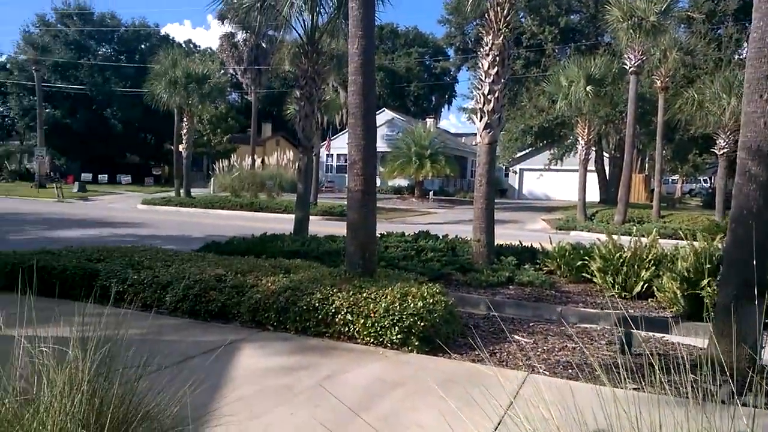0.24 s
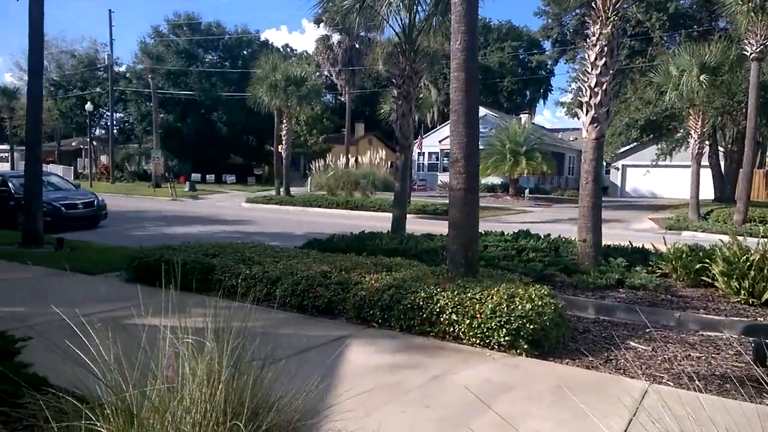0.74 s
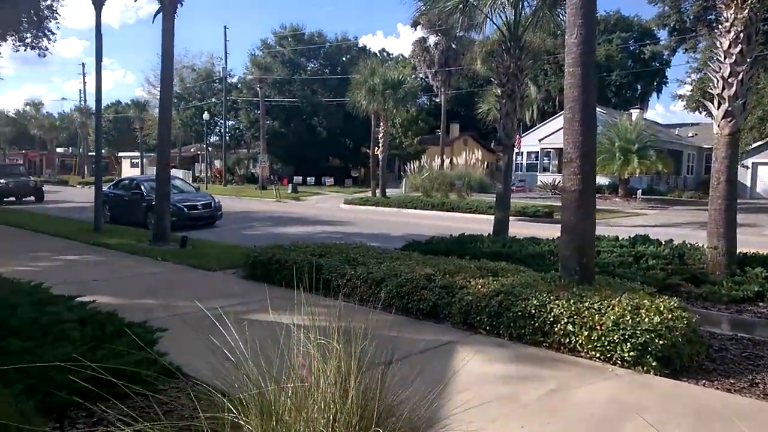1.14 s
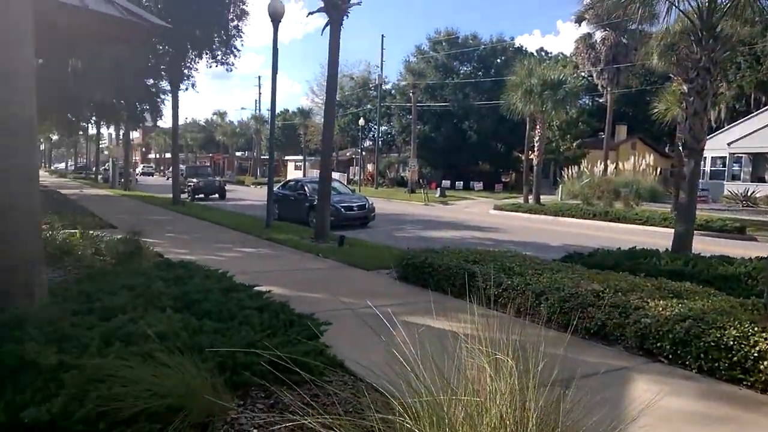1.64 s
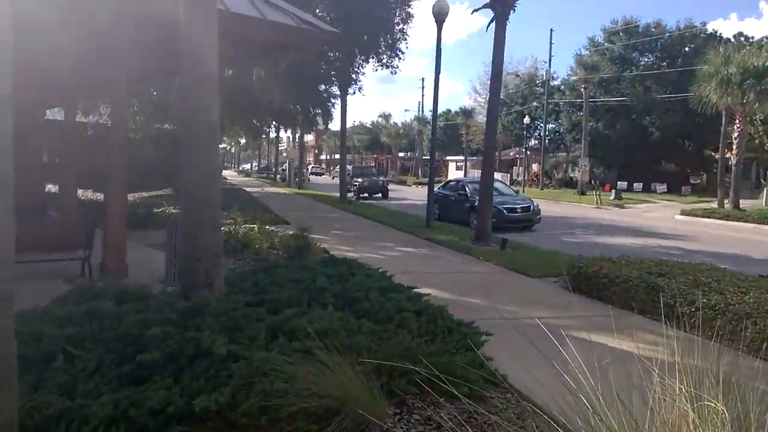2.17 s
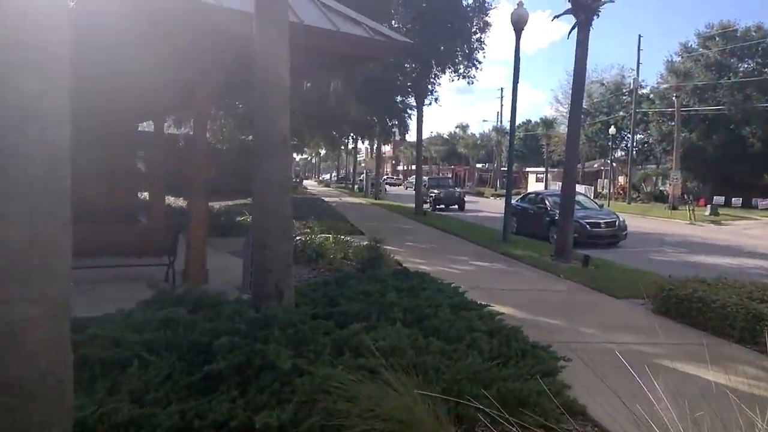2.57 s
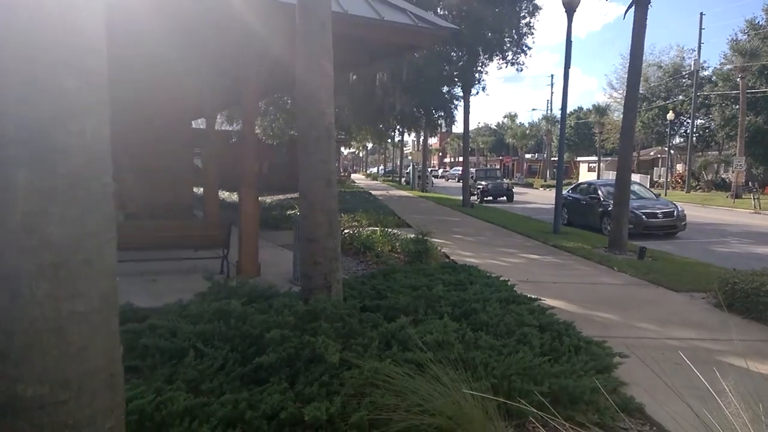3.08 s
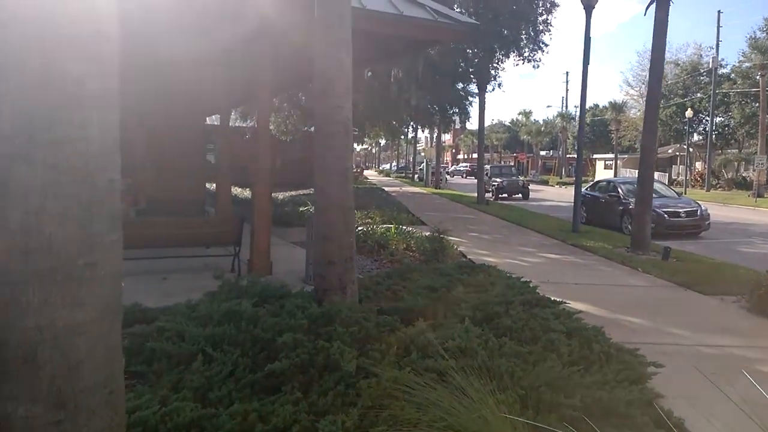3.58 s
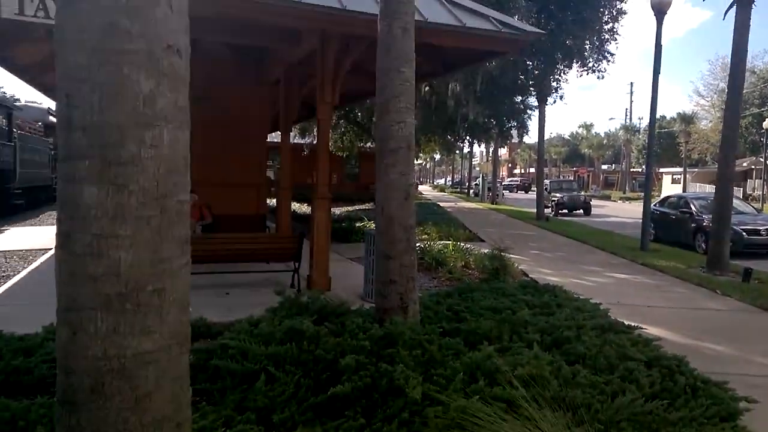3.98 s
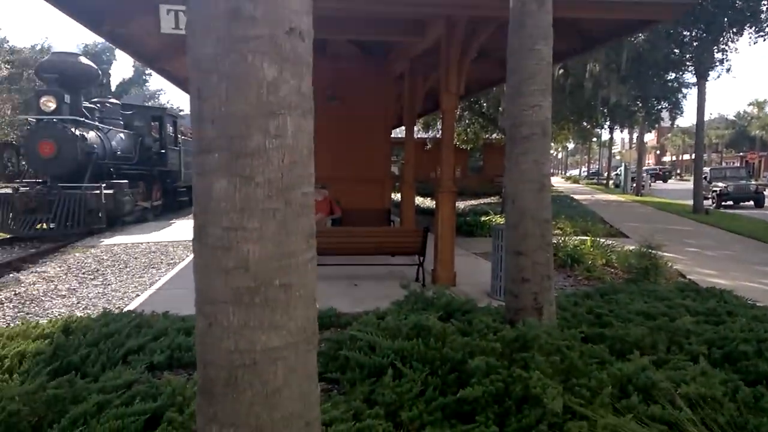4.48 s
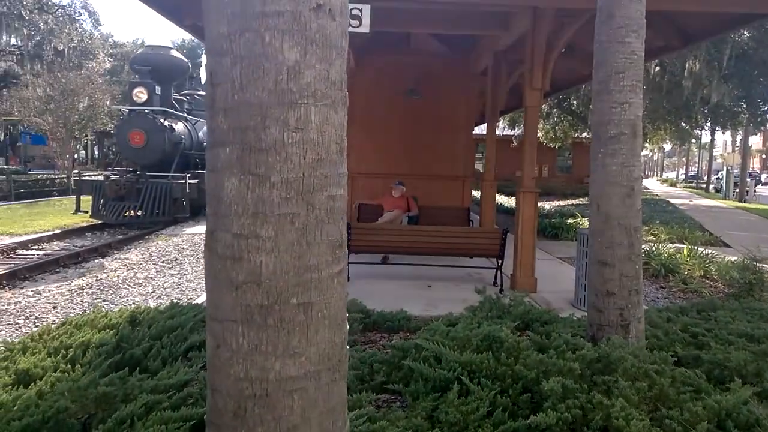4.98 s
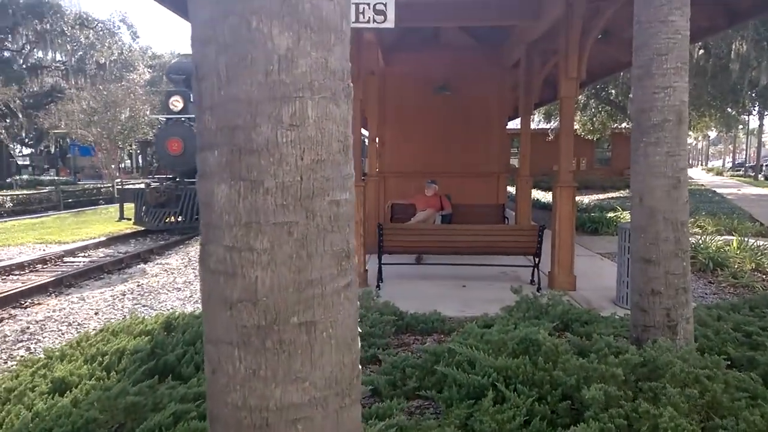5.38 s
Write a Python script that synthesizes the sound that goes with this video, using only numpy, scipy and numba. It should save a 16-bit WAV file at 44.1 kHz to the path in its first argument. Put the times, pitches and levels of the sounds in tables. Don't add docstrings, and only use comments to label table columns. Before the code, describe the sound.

Steam hiss runs throughout, heard at some distance from a garden path by one microphone, identical in both channels apart from tiny noise patches. Early on comes a sharp, quickly fading puff of air with a falling whistle; a second, more pitched puff follows around 2.3 seconds. Afterwards the hiss turns hollow from nearby reflections, then plainer. Weak firebox rumble, generator hum and street murmur stay behind.

```python
import sys
import numpy as np
from scipy import signal
from scipy.fft import rfft, irfft, next_fast_len
from scipy.io import wavfile
from numba import njit

SR = 44100
rng = np.random.default_rng(int(sys.argv[2]) if len(sys.argv) > 2 else 0)


def bounce(signal):
    frames = np.transpose(np.atleast_2d(signal))
    limited = np.clip(frames, -1, 1)
    pcm = np.round(limited * 32767).astype(np.int16)
    wavfile.write(sys.argv[1], SR, pcm)


def elevation(decibels):
    levels = np.asarray(decibels, float)
    return 10 ** (levels / 20)


N = 247842
FINE = 4


def rms_one(x):
    return x / np.sqrt(np.mean(x ** 2) + 1e-20)


def in_time(rows):
    s, *columns = np.transpose(rows)
    return [np.interp(np.arange(N) / SR, s, c) for c in columns]


def drift(rate):
    step = 40
    r = np.exp(-2 * np.pi * step * rate / SR)
    points = rng.standard_normal(N // step + 2002)
    slow = signal.lfilter([1], [1, -2 * r, r * r], points)[2000:]
    return np.interp(np.arange(N) / step, np.arange(len(slow)), rms_one(slow))


def coloured(spectrum, edge_db=-30):
    (first_hz, first_db), (last_hz, last_db) = spectrum[0], spectrum[-1]
    below = [(first_hz / 2, edge_db + first_db)]
    above = [(last_hz * 2, edge_db + last_db)]
    hz, db = np.transpose(below + list(spectrum) + above)
    size = next_fast_len(N)
    bins = np.arange(1, size // 2 + 2) * SR / size
    gain = elevation(np.interp(np.log(bins), np.log(hz), db))
    return rms_one(irfft(rfft(rng.standard_normal(size)) * gain, size)[:N])


@njit
def sweep(x, cosine, r):
    y = np.zeros(len(x))
    for i in range(2, len(x)):
        y[i] = x[i] - x[i - 2] + 2 * r * cosine[i] * y[i - 1] - r * r * y[i - 2]
    return y


def resonant(hz, width_hz, count=1):
    cosine = np.cos(2 * np.pi * hz / SR) * np.ones(N)
    x = rng.standard_normal(N)
    for _ in range(count):
        x = sweep(x, cosine, np.exp(-np.pi * width_hz / SR))
    return rms_one(x)


def pipes(modes):
    return rms_one(sum(elevation(db) * np.sqrt(width) * resonant(hz, width) for hz, width, db in modes))


def peaked(s, length, db, rise, fall):
    t = np.arange(N) / SR
    return db - rise * np.maximum(s - t, 0) - fall * np.maximum(t - s - length, 0)


def finer(x):
    return signal.resample_poly(x, FINE, 1)


def delayed(fine, lag_ms):
    return np.interp((np.arange(N) - lag_ms * SR / 1000) * FINE, np.arange(len(fine)), fine, left=0)


def dulled(x, cut_hz):
    return signal.sosfiltfilt(signal.butter(3, cut_hz, fs=SR, output="sos"), x)


# [f/Hz, level/dB per Hz]
STREET_COLOUR = [(59, -38), (100, -0.5), (130, -11), (166, -13), (220, -13), (311, -24), (433, -21.5),
                 (490, -19.5), (547, -21.5), (700, -23.5), (783, -20), (1520, -18.5), (1900, -10.5),
                 (2470, -55), (4180, -120)]


def street():
    noise = coloured(STREET_COLOUR) + elevation(-15.5) * resonant(490.5, 18)
    return elevation(-49 + 0.81 * drift(14.0)) * noise


# [multiple of the hum, level/dB]
HUM_OVERTONES = [
    (4, -25.5),
    (10, -27),
]


def generator(draught_db):
    hum_hz = 93.8
    hum_db = -50.5 + 1.1 * np.arange(N) / SR + 0.21 * draught_db
    phase = 2 * np.pi * np.cumsum(hum_hz + 0.34 * drift(2.3)) / SR
    hum = 1.05 * np.sin(phase) + 0.58 * resonant(hum_hz, width_hz=7.2)
    nearer_db = np.linspace(-56, -43, N)
    whine = np.zeros(N)
    for multiple, db in HUM_OVERTONES:
        whine += elevation(db + nearer_db + 8.2 * drift(1.2)) * np.sin(round(multiple) * phase)
    return elevation(hum_db) * hum + whine


# [t/s, peak level/dB]
GULPS = [(.12, -41.5), (.58, -43.5), (.91, -34), (1.06, -37.5), (1.47, -43.5), (1.92, -39.5), (2.36, -39),
         (2.47, -34.5), (2.8, -45), (3.16, -37.5), (3.5, -45), (4.12, -44), (4.76, -46), (5.1, -38.5),
         (5.37, -41), (5.54, -43)]


def draught(fire_db):
    gulps_db = [peaked(s, 0, db, rise=88, fall=76) for s, db in GULPS]
    return np.maximum(np.max(gulps_db, axis=0), fire_db)


# [f/Hz, level/dB per Hz]
RUMBLE = [(14, -36), (24, -28), (36, -8), (48, 1.5), (58, -2), (70, -7), (85, -14.5)]


def firebox(rumble_db):
    return elevation(rumble_db) * coloured(RUMBLE, edge_db=-22.0)


def yard():
    fire_db = -49
    rumble_db = draught(fire_db)
    return street() + generator(rumble_db - fire_db) + firebox(rumble_db)


# [lag/ms, level/dB]
WALLS = [(1.5, -25), (3.4, -29), (4.4, -18), (6.1, -17), (8.3, -23), (11.7, -20), (15.9, -23.5), (23, -16)]


def walls(x):
    fine = finer(x)
    return x + sum(elevation(db) * delayed(fine, ms + 0.041 * drift(0.83)) for ms, db in WALLS)


# [t/s,
# length/s, f/Hz, sag/Hz per s, level/dB]
WHISTLES = [
    (60, [(.8, 0.017, 885, 604, -42.5), (.83, 0.11, 850, 110, -54)]),
    (170, [(.81, 0.085, 2810, 1900, -32), (.92, 0.084, 2460, 1100, -35), (1.03, .05, 2360, 300, -40)]),
    (120, [(2.34, 0.12, 2870, 1700, -31.5), (2.5, 0.048, 2800, 300, -37)]),
    (50, [(2.36, 0.12, 1862, 20, -29), (2.51, 0.062, 1883, 150, -34)]),
]


def whistles():
    out, t = np.zeros(N), np.arange(N) / SR
    for width_hz, notes in WHISTLES:
        for s, length, hz, sag, db in notes:
            level_db = np.maximum(peaked(s, length, db, rise=600, fall=450), -200)
            pitch_hz = hz - sag * np.clip(t - s, 0, length)
            out += elevation(level_db) * resonant(pitch_hz, width_hz, count=2)
    return out


def stroke(s, swell, fall, length):
    open_s, shut_s = 0.026, 0.028
    last_db = -fall * (length - swell)
    return in_time([(s - open_s, -70), (s, -36), (s + open_s, -5.5), (s + swell, 0),
                    (s + length, last_db), (s + length + shut_s, last_db - 15),
                    (s + length + 2 * shut_s, -70)])[0]


# [t/s, peak level/dB, swell/s, fall/dB per s, length/s]
PUFFS = [
    (.775, -25, 0.11, 76, 0.312),
    (2.298, -24.5, 0.1, 46, .305),
]
# [f/Hz, level/dB per Hz]
PUFF_COLOURS = [
    [(290, -49), (500, -31), (841, -8), (1050, -13), (1220, -8.5), (1760, -3.5), (2620, -1), (3380, -17),
     (5890, -9), (8270, -41), (9000, -11), (11700, -20), (19800, -120)],
    [(290, -58), (500, -22), (677, -25), (782, -21), (893, -12), (1320, -9.5), (1820, -8.5), (2410, -12),
     (2750, -1), (3680, -15), (9000, -19), (11700, -57), (19800, -120)],
]
# [f/Hz, width/Hz, level/dB]
PUFF_PIPES = [
    [(700, 12, -7.5), (1222, 34, -6.5), (1840, 20, -7), (2300, 140, -4.5), (3230, 200, -6.5),
     (3900, 290, -9), (4500, 510, -13)],
    [(693, 11, -8), (992, 24, -2.5), (1190, 22, -14), (1557, 25, -1), (1690, 100, -3), (2340, 44, -3),
     (3235, 140, -1), (3930, 45, -6.5), (4300, 57, -4), (4600, 30, -15)],
]
# [f/Hz, width/Hz, level/dB]
THUMP_PIPES = [(66.4, 11.5, -1), (183, 13, -17.5), (242, 7.3, -4), (378.5, 8, -3.5), (417, 14, -13.5)]


def puffs():
    out = whistles()
    for (s, db, *shape), colour, modes in zip(PUFFS, PUFF_COLOURS, PUFF_PIPES):
        body_db = db + stroke(s, *shape) + 0.16 * drift(17)
        thump_db = -36.5 + 0.89 * stroke(s + 0.02, *shape)
        body = elevation(-3.0) * coloured(colour) + elevation(-4) * pipes(modes)
        thump = elevation(0.5) * pipes(THUMP_PIPES) + elevation(-8.0) * coloured([(140, -1.5), (600, -3)])
        out += elevation(body_db) * body + elevation(thump_db) * thump
    return out


# [f/Hz, level/dB per Hz]
TOP_COLOUR = [(9500, -1), (11500, -0.5), (13000, 1.5), (14200, 0.5), (15500, 2.5), (17000, -15.5)]


def mottled_top(patch_db):
    top, edges = coloured(TOP_COLOUR), np.arange(9500, 17001, 750)
    out = np.zeros(N)
    for k, pair in enumerate(zip(edges, edges[1:])):
        band = signal.sosfilt(signal.butter(2, pair, "band", fs=SR, output="sos"), top)
        out += (-1) ** k * elevation(patch_db * drift(1.7)) * band
    return rms_one(out)


def ridge(hz, db, width_hz, flutter_db):
    return elevation(db - 3.5 + flutter_db * drift(17)) * resonant(hz, width_hz, count=2)


# [f/Hz, level/dB per Hz]
JET_COLOUR = [(710, -53), (1200, -14.5), (1390, -33), (1940, -7.5), (2340, -1), (3160, -10), (4610, -11.5),
              (6410, -8), (9740, -2), (13000, -12.5)]
# [t/s, open sight of the jet level/dB, by way of the shelter level/dB, past the trunks level/dB]
WALK = [(0, 11, 0.5, 8), (.92, 9.5, 0.5, 5.5), (1.25, -4.5, 1.5, 4.5), (1.5, 3.5, 3.5, 5),
        (1.75, 8, 4.5, 6.5), (1.95, -0.5, 6, 3.5), (2.3, -2, 5.5, 1.5), (2.6, -2, 7, -9),
        (3.0, -2, 4.5, -7), (3.35, 2, 7, -4), (3.62, -2, 5, -4), (3.8, 5, 4, 0), (4.0, 0, 2.2, -3.5),
        (4.4, 1, 1, 1.5), (4.55, 2, -4.5, 3), (4.8, -5, -13, -2), (5.15, -7, -3, -2), (5.62, -7, -6, -4)]
# [t/s, f/Hz, level/dB]
HIGH_RIDGE = [(0, 9800, -39.5), (.5, 9160, -35), (.85, 9500, -40), (1.1, 9700, -36.5), (1.3, 9550, -38),
              (1.58, 9950, -31.5), (1.8, 10100, -38), (1.95, 9600, -39), (2.28, 9450, -35.5), (2.53, 9000, -39.5),
              (2.65, 9480, -32.5), (3.65, 9670, -33), (3.82, 9280, -34.5), (3.97, 9500, -32), (4.12, 9150, -36),
              (4.27, 9500, -31), (4.65, 9600, -37.5), (5.62, 9650, -39)]
JET_FOLLOWS = (0.045, -0.16, -0.24, 0.37)


def leak():
    sight, shelter, trunks = in_time(WALK)
    edge_hz, edge_db = in_time(HIGH_RIDGE)
    jet_db = -38.5 + np.dot(JET_FOLLOWS, [sight, shelter, trunks, edge_db - edge_db.mean()])
    jet = elevation(jet_db + 0.96 * drift(8.5)) * coloured(JET_COLOUR)
    top = elevation(-46.5 + sight + 0.3 * drift(9.2)) * mottled_top(patch_db=2.5)
    low = ridge(2564 + 18 * shelter + 14 * sight, -39 + shelter, width_hz=2460, flutter_db=0.79)
    mid = ridge(4970 - 52 * shelter, -39 + trunks, width_hz=3240, flutter_db=0.51)
    edge = ridge(edge_hz, edge_db, width_hz=1430, flutter_db=1.0)
    return jet + top + low + mid + edge


# [offset/ms, share]
ECHO = [
    [(-.1, 0.12), (0, 3.4), (.12, 0.77)],
    [(-.1, 0.6), (0, -2.5), (.11, -0.2)],
    [(-.235, -0.24), (0, -1.01), (.235, -.3)],
]
ECHO_CUT_HZ = [
    5400,
    12000,
    11000,
]
# [t/s, lag/ms, strength]
HAND = [(0, 0.24, 0.017), (.8, .35, 0.07), (1.0, 0.36, .12), (1.25, 0.42, 0.15), (1.42, .46, 0.061),
        (1.6, 0.51, 0.13), (2.3, 0.56, 0.078), (2.5, .46, 0)]
TRUNK = [(1.35, 1, 0), (1.6, 1.04, 0.062), (1.9, 1.06, 0.069), (2.25, 1.1, 0.09), (2.4, 1.1, .03),
         (2.65, .95, 0.04), (4.3, 0.98, 0.0076), (4.5, 1.08, 0.11), (4.68, 1.02, 0.05), (4.76, 1.02, 0),
         (4.8, .36, 0.039), (5.0, 0.4, 0.032), (5.62, 0.41, 0.098)]
SHELTER = [(2.54, 0.46, .01), (2.63, .479, 0.18), (2.9, 0.5, .33), (3.3, 0.47, .33), (3.65, .474, .33),
           (3.8, .54, .36), (3.97, .597, .42), (4.15, .655, .36), (4.32, .7, .26), (4.45, .74, 0)]


def hiss():
    direct = leak()
    heard = direct.copy()
    for shape, track, cut_hz in zip(ECHO, (HAND, TRUNK, SHELTER), ECHO_CUT_HZ):
        lag_ms, strength = in_time(track)
        returned = finer(dulled(direct, cut_hz))
        heard += strength * sum(share * delayed(returned, lag_ms + ms) for ms, share in shape)
    return heard


def scene():
    return np.tile(yard() + walls(puffs() + hiss()), (2, 1))


# [t/s, low f/Hz, high f/Hz, level/dB]
SPLITS = [(-.01, 4950, 6930, -41), (-.01, 8740, 11150, -44), (-.01, 11840, 13870, -44),
          (.036, 11670, 13180, -44), (.687, 10900, 13090, -43), (.687, 13650, 15160, -47),
          (.756, 9560, 11070, -46), (1.987, 5120, 6330, -47), (1.987, 14510, 15750, -57),
          (2.033, 8830, 10380, -42), (2.033, 14510, 15750, -57), (2.405, 4520, 6630, -41),
          (2.405, 7800, 9650, -44), (2.405, 13400, 15750, -52), (2.428, 6100, 8400, -44),
          (2.428, 13050, 14640, -53), (2.567, 5040, 6890, -47), (2.707, 13700, 15200, -54),
          (3.009, 10850, 12400, -50), (4.030, 13090, 15200, -55), (4.193, 8180, 9690, -40),
          (4.704, 13700, 15160, -56), (5.424, 6800, 9040, -46)]


def splits():
    frame, grid = 2048, 581
    window = signal.windows.kaiser_bessel_derived(frame, 4 * np.pi)
    side, hz = np.zeros(N + 2 * frame), np.arange(frame // 2 + 1) * SR / frame
    for s, low_hz, high_hz, db in SPLITS:
        band = irfft(rfft(rng.standard_normal(frame)) * (hz > low_hz) * (hz < high_hz))
        half_steps = round((s * SR - grid) * 2 / frame + 1)
        start = grid + half_steps * frame // 2
        side[start:start + frame] += elevation(db) * rms_one(band) * window
    return side[frame:frame + N]


def roll_off(x):
    return signal.sosfilt(signal.butter(12, 17070, fs=SR, output="sos"), x)


def record(dry):
    top_cut = signal.ellip(14, 0.3, 80, 15790, fs=SR, output="sos")
    mix = signal.sosfilt(top_cut, dry) + splits() * [[1], [-1]]
    return roll_off(mix)


dry = scene()
out = record(dry)
bounce(out)
```